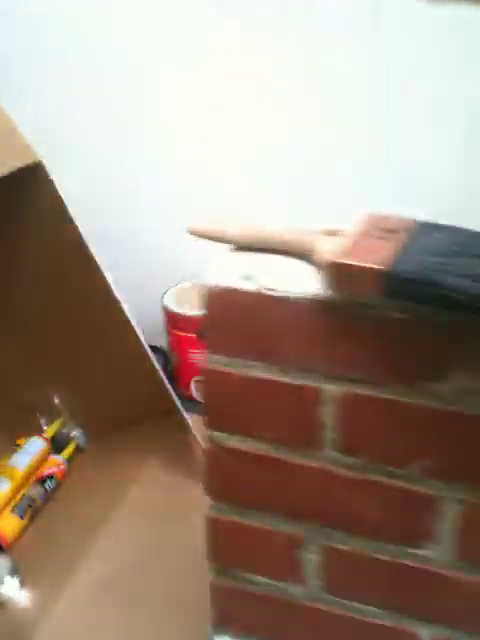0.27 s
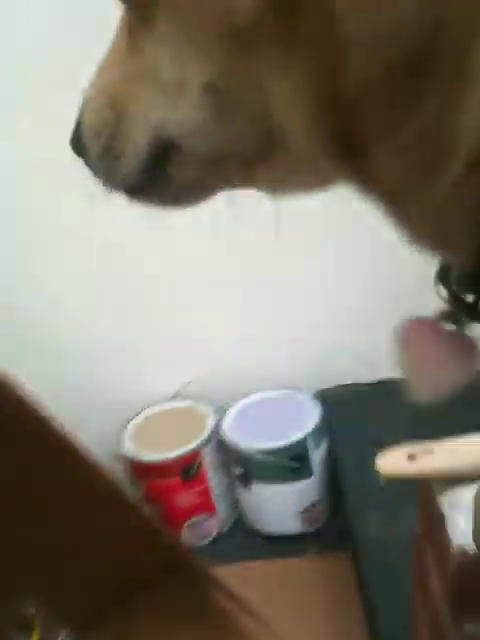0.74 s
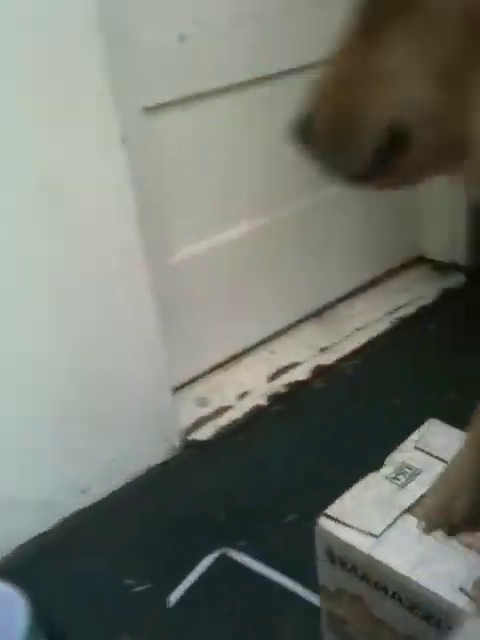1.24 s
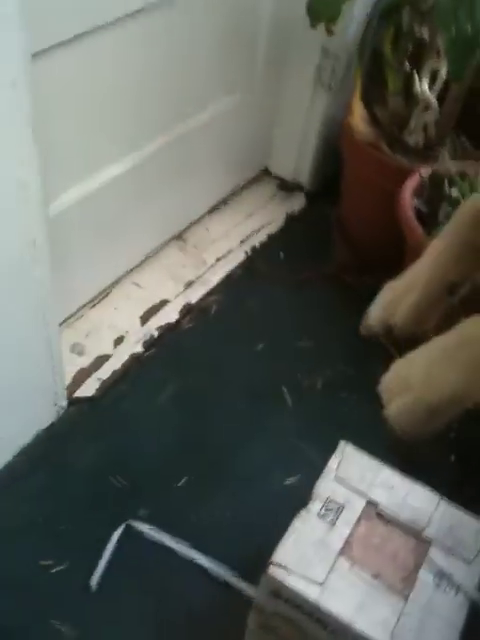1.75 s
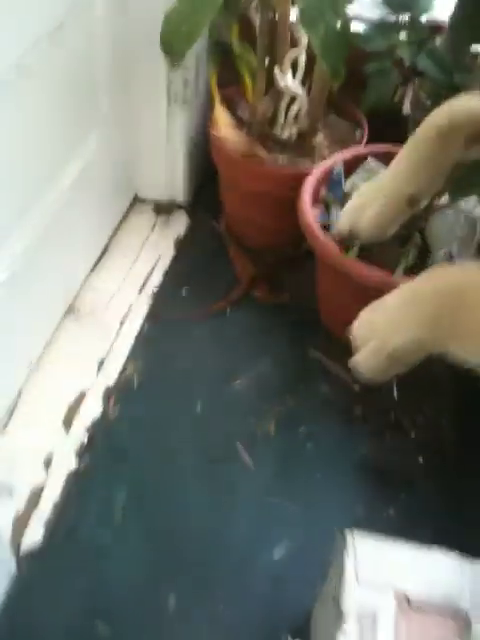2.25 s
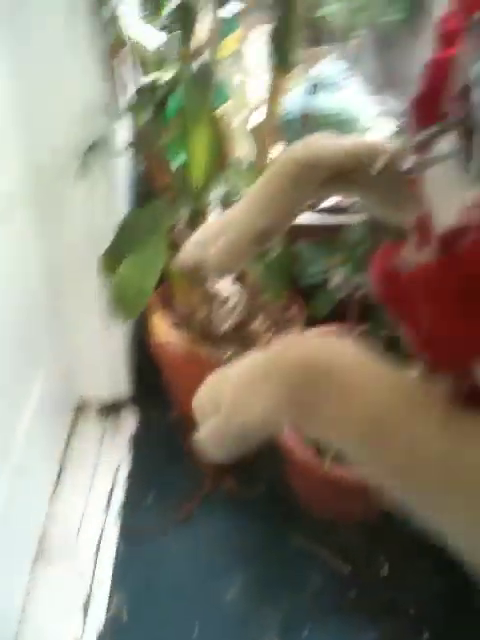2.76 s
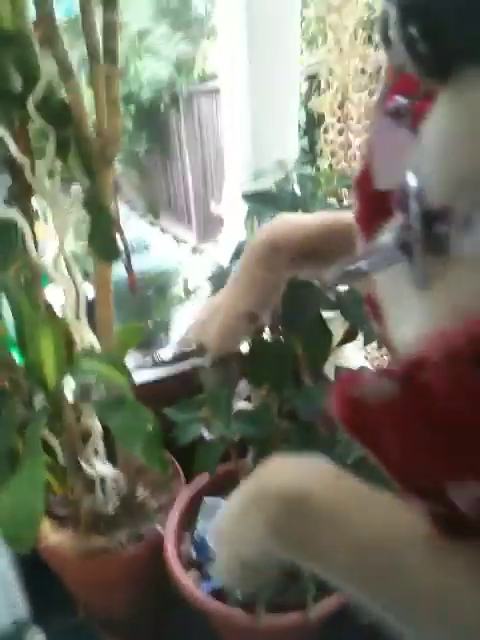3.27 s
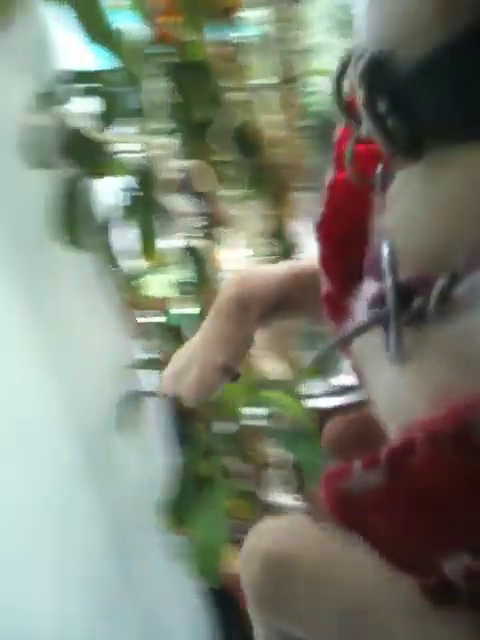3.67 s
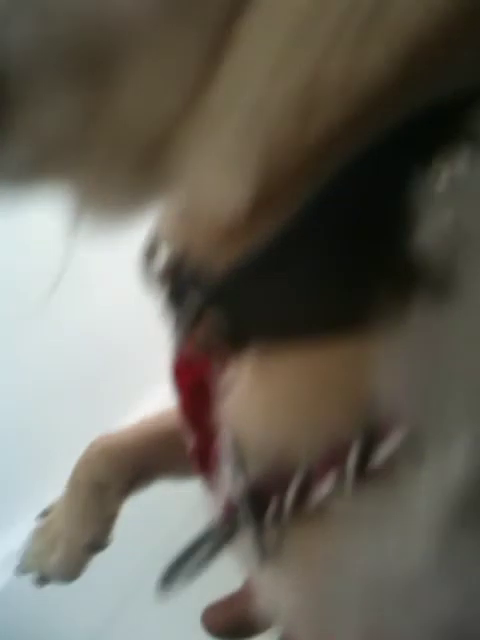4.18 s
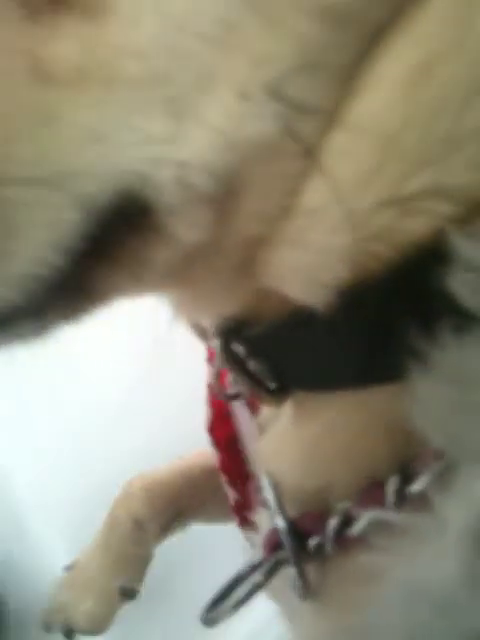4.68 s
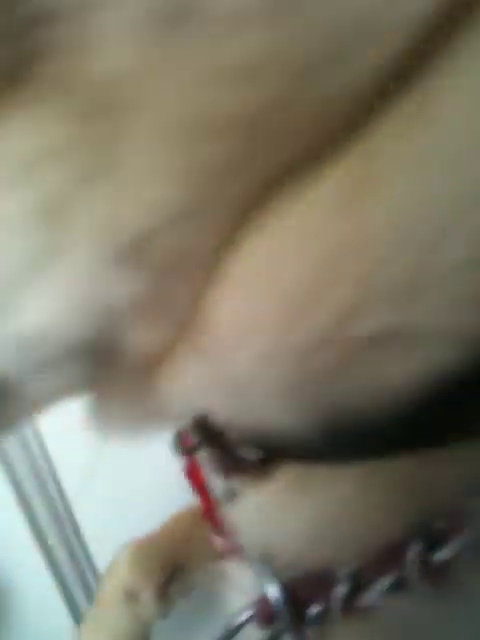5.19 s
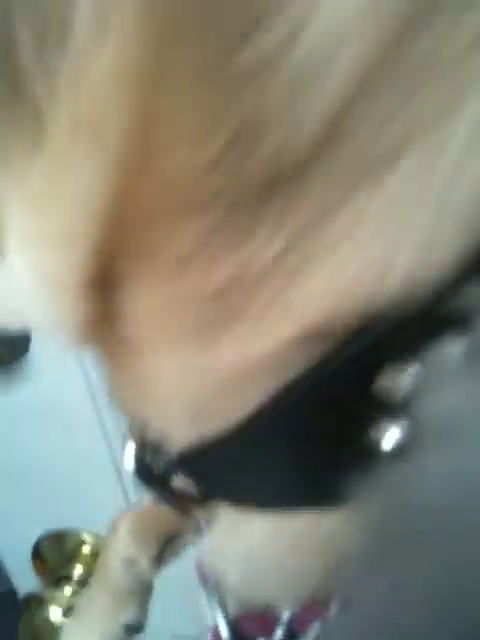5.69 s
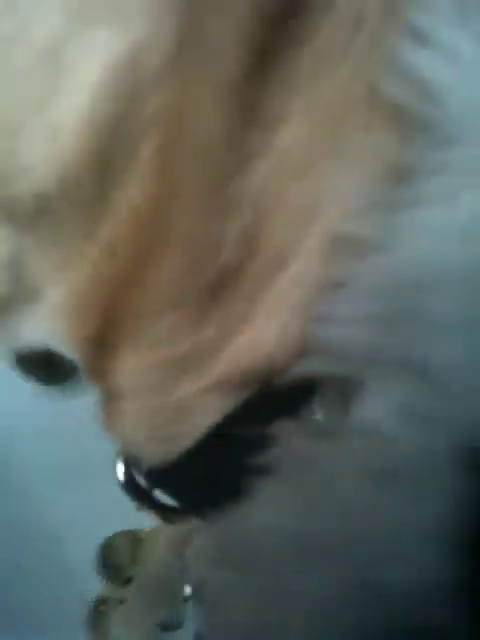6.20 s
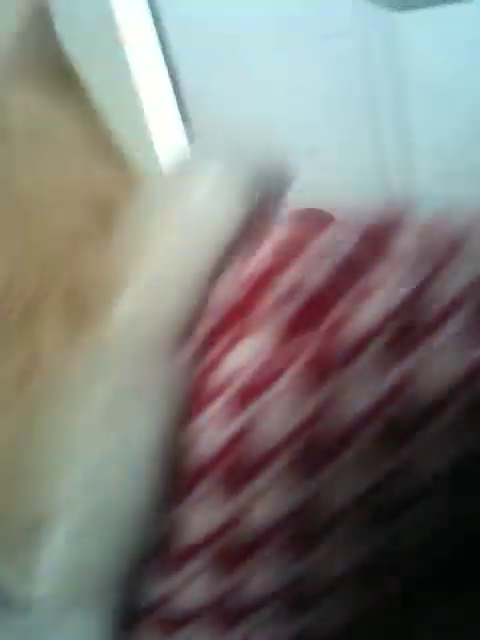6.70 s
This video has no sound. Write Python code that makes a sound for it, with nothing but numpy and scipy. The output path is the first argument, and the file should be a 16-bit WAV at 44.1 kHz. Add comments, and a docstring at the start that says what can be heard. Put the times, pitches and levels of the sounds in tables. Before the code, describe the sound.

Close metal links and a tag click irregularly over rubbing fur and cloth, interrupted by a sharp bump and scrape on the microphone.

```python
"""A dog's chain collar clicks, link against link, as the dog is carried on an arm across a porch, close to
the microphone of a small camera. Fur and cloth rub, paws and a hand knock softly, a metal name tag clinks,
and once something bumps and scrapes right on the microphone hole. A faint whistle comes and goes;
under it all lie quiet outdoor air and the hiss of the recorder."""
import sys
import numpy as np
from scipy import signal
from scipy.fft import rfft, irfft, next_fast_len
from scipy.io import wavfile
from scipy.ndimage import map_coordinates

SR = 44100
rng = np.random.default_rng(int(sys.argv[2]) if len(sys.argv) > 2 else 0)


def log_audio(samples):
    """Write samples as a 16-bit WAV file to the path given in sys.argv[1]."""
    # one column per channel
    frames = np.atleast_2d(samples).T
    # limit to full scale, then quantise
    limited = np.clip(frames, -1, 1)
    pcm = np.round(limited * 32767).astype(np.int16)
    wavfile.write(sys.argv[1], SR, pcm)


N = 305990
TIME = np.arange(N) / SR


def amp(db):
    """Gain of a level in dB."""
    return 10 ** (np.asarray(db) / 20)


def unit(x):
    """x scaled to rms 1."""
    return x / np.sqrt(np.mean(x ** 2) + 1e-20)


def fade(t, t60):
    """Gain that falls by 60 dB in t60 seconds."""
    return amp(-60 * t / t60)


def ring(t, hz, t60):
    """One dying tone of struck metal."""
    return fade(t, t60) * np.sin(2 * np.pi * hz * t)


def filtered(x, response):
    """x through a response given as a function of Hz."""
    size = next_fast_len(len(x) + 8192)
    hz = np.fft.rfftfreq(size, 1 / SR) + 1e-3
    return irfft(rfft(x, size) * response(hz), size)[:len(x)]


def resonance(f, hz, width_hz):
    """Causal response of one resonance at the frequencies f."""
    return 1j * f * width_hz / (hz * hz - f * f + 1j * f * width_hz)


def grainy_noise(spectrum, grit_db, grains_per_s):
    """Noise of rms 1 with a spectrum of (Hz, dB) points; its level jumps from grain to grain."""
    grains = rng.standard_normal(grains_per_s * N // SR + 2)
    jumps = map_coordinates(grains, [TIME * grains_per_s])
    noise = rng.standard_normal(N) * amp(grit_db * jumps)
    points_hz, db = np.transpose(spectrum)
    return unit(filtered(noise, lambda hz: amp(np.interp(np.log(hz), np.log(points_hz), db))))


def impacts(t, hz, t60, sharpness, rise_s, push, top_hz):
    """One row a contact: a push and a dying puff of noise through a double resonance, dull above top_hz."""
    envelope = fade(t, t60) * (1 - np.exp(-t / rise_s))
    energy = np.sum(envelope ** 2, 1)
    force = rng.standard_normal(envelope.shape) * envelope
    force[:, 1] = push * np.sqrt(energy)
    f = np.fft.rfftfreq(2 * len(t), 1 / SR)
    body = resonance(f, hz, hz / sharpness) ** 2
    low_pass = resonance(f, top_hz, top_hz) * top_hz / (1j * f + 1)
    puffs = irfft(rfft(force, 2 * len(t)) * body * low_pass)[:, :len(t)]
    return puffs * np.sqrt(energy / np.sum(puffs ** 2, 1))[:, None]


def placed(starts_s, sounds):
    """A track with each sound mixed in at its start."""
    track = np.zeros(N)
    for start, sound in zip(np.ravel(starts_s), sounds):
        part = track[round(start * SR):][:len(sound)]
        part += sound[:len(part)]
    return track


# Spectra of the dull rub, middle rub and fine swish. Each row: frequency in Hz, density in dB.
DULL_SPECTRUM = [(40, -10), (105, -20), (165, -0.5), (280, -0.5), (450, -4), (700, -7), (1000, -22),
                 (2000, -60)]
MIDDLE_SPECTRUM = [(400, -29.5), (750, -1.5), (1150, -1), (1400, -5), (2200, -7), (2900, -17.5),
                   (5000, -34.5)]
SWISH_SPECTRUM = [(1180, -30), (2000, -0.5), (3210, -6.5), (7150, -4), (7810, -3), (11200, -10.5),
                  (12400, -9), (15000, -17), (15800, -19), (16300, -33.5)]
# Fur brushing steadily on knitted cloth. Each row: time in seconds, middle rub and swish in dB.
BRUSHING = [(0, -60, -59), (.33, -62, -60), (.7, -64.5, -64.5), (.82, -68, -71.5), (.92, -59, -59),
            (1.13, -65, -62.5), (1.6, -64.5, -67), (1.95, -60.5, -61), (2.3, -64, -64.5), (2.5, -66, -81),
            (2.9, -60, -68.5), (3.55, -64, -70.5), (3.8, -70.5, -77.5), (4.1, -65, -65), (4.8, -69, -73.5),
            (5.4, -66, -76), (5.85, -77, -82.5), (6.1, -64, -68), (6.5, -72, -77.5), (6.8, -75.5, -77),
            (6.94, -59, -66)]
# Strokes of cloth, fur and hand, close to the microphone.
# Each row: peak time, rise and fall in seconds, then dull rub, middle rub and swish in dB.
STROKES = [(.374, 0.065, .1, -69, -60, -54), (.488, .06, .09, -56.5, -54.5, -55.5),
           (.6, 0.059, 0.12, -64, -62, -57), (.74, .1, .1, -58, -66, -66), (.87, 0.18, .15, -59, -72, -75),
           (.972, 0.039, 0.088, -43.5, -49, -42.5), (1.006, .05, 0.062, -43, -48, -39),
           (1.162, 0.052, 0.092, -73, -71, -57), (1.269, 0.094, 0.12, -42, -47.5, -60),
           (1.37, .15, 0.12, -58, -59, -55.5), (1.599, 0.1, 0.084, -66, -66, -55),
           (1.768, 0.043, .08, -62, -64, -54.5), (1.94, 0.18, .1, -48.5, -51, -55),
           (2.214, 0.073, .07, -54.5, -59, -59), (2.552, .02, 0.099, -41, -41, -56),
           (2.879, 0.25, .2, -59.5, -61, -66), (3.047, 0.058, 0.072, -49.5, -50, -52.5),
           (3.62, 0.23, .3, -60, -71, -78), (3.827, .07, .1, -51.5, -68.5, -68),
           (3.899, 0.044, 0.068, -57, -55.5, -52), (4.265, .2, .11, -69, -52.5, -50),
           (4.44, .015, .06, -62, -58, -50), (4.48, 0.076, .2, -60, -60, -62),
           (4.655, 0.032, 0.085, -61, -53, -59.5), (4.79, .1, 0.084, -68, -73, -64),
           (5.054, 0.057, 0.047, -57, -57, -53), (5.151, .015, .06, -49, -54, -58),
           (5.225, .06, .06, -43, -52, -72), (5.268, 0.064, 0.058, -44, -40, -55.5),
           (5.327, .05, 0.21, -52, -60, -76), (5.698, .04, .09, -67.5, -63, -48),
           (5.97, .05, 0.11, -62, -62, -60), (6.08, .13, 0.11, -57.5, -54.5, -62),
           (6.245, .02, .13, -63, -68, -56), (6.538, 0.086, 0.096, -57.5, -63, -65)]


def rubbing(dull_floor_db=-67, waver_db=2, edge_db=21.5, roundness=1.186):
    """Fibres catch and let go: gritty noise in three sizes of contact, swelling with each stroke."""
    t = np.arange(0, N + 64, 64) / SR
    times, middle_db, swish_db = np.transpose(BRUSHING)
    steady_db = [np.full_like(t, dull_floor_db), np.interp(t, times, middle_db),
                 np.interp(t, times, swish_db)]
    waver = [map_coordinates(drift, [t * 10]) for drift in rng.standard_normal((3, 80))]
    steady = amp(waver_db * np.array(waver) + steady_db)
    peak, rise, fall, *stroke_db = np.transpose(STROKES)[:, :, None]
    from_peak = np.abs(t - peak) / np.where(t < peak, rise, fall)
    swell = amp(-edge_db * from_peak ** roundness)
    power = steady ** 2 + amp(np.squeeze(stroke_db)) ** 2 @ swell ** 2
    dull, middle, swish = [np.interp(TIME, t, np.sqrt(band)) for band in power]
    return (dull * grainy_noise(DULL_SPECTRUM, grit_db=2.5, grains_per_s=50)
            + middle * grainy_noise(MIDDLE_SPECTRUM, grit_db=2.5, grains_per_s=120)
            + swish * grainy_noise(SWISH_SPECTRUM, grit_db=2, grains_per_s=200))


# A faint whistle behind the dog's sounds.
# Each row: start and end in seconds, pitch in Hz, level in dB, gain of the overtones in dB.
WHISTLES = [(0, .68, 2140, -65, 1), (3.46, 3.63, 1870, -64, -25), (5.29, 5.46, 1790, -59, -25),
            (6.83, 7, 1800, -63, -25)]


def whistle(width_hz=130, edge_s=.03):
    """A fuzzy tone: noise through a narrow resonance and its first multiples, fading in and out."""
    track = np.zeros(N)
    for start, end, hz, db, overtones_db in WHISTLES:
        def harmonics(f):
            return sum(amp(overtones_db * (k > 1)) * resonance(f, k * hz, k * width_hz) ** 2 / k ** .5
                       for k in range(1, 5))
        gate = np.clip(np.minimum(TIME - start, end - TIME) / edge_s, 0, 1)
        track += amp(db) * gate * unit(filtered(rng.standard_normal(N), harmonics))
    return track


# The background on the porch. Each row: frequency in Hz, density in dB.
AIR_SPECTRUM = [(15, -45), (25, -17), (53, -12), (95, -6), (146, -2), (237, 0), (295, -6), (873, -7.5),
                (1350, -12), (1820, -12), (2960, -21), (9500, -24.5), (15100, -31), (16300, -42)]


def outdoor_air(level_db=-63):
    """Quiet open air and recorder hiss, as one slightly wavering noise."""
    return amp(level_db) * grainy_noise(AIR_SPECTRUM, grit_db=.7, grains_per_s=20)


# The tones of the collar's links and rings. Each row: pitch in Hz, t60 in seconds.
LINK_TONES = [(3620, .045), (4850, .04), (5100, .065), (5800, .07), (6430, .07), (7830, .06), (8950, .04),
              (9420, 0.057), (10020, 0.059), (10610, .05), (11360, .06), (12080, 0.045), (13230, .04),
              (13770, .05), (14400, .05), (15080, .03)]
# Links touching, close to the microphone. Each row: start in seconds, level in dB,
# centre of the crack in Hz, pitch of the struck link in Hz, its ringing in dB relative to the crack.
LINK_CLICKS = [(.0691, -44, 6050, 5800, -8), (.0917, -31, 7990, 8950, -21), (.183, -40, 6600, 8950, -19),
               (.3566, -28, 8900, 3620, -8), (.3639, -19.5, 10500, 11360, -14),
               (.4707, -42, 5970, 5800, -13), (.4882, -39.5, 7450, 6430, -20),
               (.5305, -46, 4700, 5100, -20), (.5807, -38.5, 8860, 6430, -26), (.5987, -40, 6410, 6430, -8),
               (.6023, -40, 6870, 3620, -12), (.6637, -31.5, 9400, 12080, -15),
               (.7128, -33, 6700, 6430, -6.5), (.7192, -42, 6680, 3620, -10), (.7639, -41, 8880, 4850, -13),
               (.7948, -43, 8210, 8950, -25), (.8422, -47, 7060, 8950, -17), (.8976, -39, 9000, 10020, -29),
               (.9226, -43.5, 7320, 4850, -11), (.9596, -37, 8090, 5800, -7), (.9634, -31, 7110, 6430, -15),
               (.9674, -30, 7600, 10610, -13), (.9857, -22, 8620, 7830, -11),
               (.9904, -15.5, 7470, 7830, -17.5), (1.0016, -9, 7830, 8950, -28),
               (1.0176, -16, 7450, 7830, -21), (1.0208, -22, 6500, 6430, -16),
               (1.0739, -44, 6810, 5100, -10), (1.0859, -43, 8000, 7830, -19),
               (1.1462, -39, 9000, 13770, -28), (1.3298, -45, 8260, 7830, -10),
               (1.4581, -48, 6050, 5800, -9), (1.4922, -42.5, 6950, 5100, -16),
               (1.5441, -40, 9520, 7830, -29), (1.5793, -28.5, 9460, 14400, -18),
               (1.6133, -45, 6280, 5800, -3.5), (1.6209, -52, 5990, 5800, -4),
               (1.6653, -40.5, 7140, 7830, -30), (1.7335, -45, 7130, 5100, -26),
               (1.7657, -28, 10500, 11360, -9), (1.7705, -40, 9400, 5100, -2),
               (1.8395, -32, 7750, 5800, -20), (1.8906, -45, 9000, 4850, -28),
               (1.9148, -43.5, 5660, 3620, -9), (1.9405, -43, 6940, 3620, -18),
               (1.9609, -34, 2900, 3620, -28), (2.0405, -48, 4900, 5100, -16),
               (2.2378, -48, 5630, 5800, -15), (2.5043, -35, 6000, 10610, -13),
               (2.542, -38, 8000, 3620, -13), (2.6787, -55, 5920, 5800, -14),
               (2.9565, -56, 4730, 5100, -16), (3.0449, -30, 9540, 5100, -16),
               (3.0486, -36, 7520, 5100, -18), (3.1846, -21.5, 4300, 4850, -30),
               (3.6537, -51.5, 5000, 3620, -23), (3.7698, -45.5, 9900, 10020, -12),
               (3.8855, -29.5, 5370, 7830, -15.5), (3.9892, -35, 8050, 5800, -23),
               (3.9954, -48, 7940, 13230, -18), (4.0884, -42.5, 7170, 3620, -3),
               (4.0937, -40, 7300, 3620, -21), (4.1654, -45, 5360, 3620, -10),
               (4.4335, -34, 8860, 10610, -16), (4.4418, -38, 8300, 12080, -16),
               (4.4854, -48, 7510, 5800, -17), (4.5248, -40.5, 4700, 3620, -27.5),
               (4.6039, -51, 5660, 3620, -22), (4.6435, -26, 4760, 4850, -24),
               (4.6469, -31.5, 5020, 4850, -18), (4.6827, -54, 5680, 3620, -19),
               (4.7078, -50, 5740, 3620, -21), (4.8859, -52, 9800, 10020, -18),
               (4.9072, -54, 9000, 5800, -18), (5.0426, -45.5, 6400, 8950, -14),
               (5.1445, -41, 5730, 4850, -11), (5.2493, -39, 5580, 3620, -15),
               (5.2739, -36, 5510, 3620, -13), (5.7154, -39, 8760, 8950, -10),
               (5.7446, -34, 10100, 10020, -14.5), (5.7473, -40, 9030, 10610, -21.5),
               (5.9834, -39.5, 9100, 9420, -17), (6.1036, -52, 9000, 7830, -20),
               (6.2333, -29, 5230, 5100, -27), (6.3924, -52, 5540, 4850, -21),
               (6.812, -48.5, 4600, 4850, -27)]


def chance_ticks(per_s=6, level_db=-55.5, centre_hz=6500, ring_db=-15):
    """Faint touches of the links at random times, as rows like those of LINK_CLICKS."""
    when, link, size, pitch = rng.random((per_s * N // SR, 4)).T
    db = level_db + 8 * (size - .5)
    crack_hz = centre_hz * 2 ** (.9 * (pitch - .5))
    struck_hz = np.array(LINK_TONES)[(link * len(LINK_TONES)).astype(int), 0]
    return np.transpose([when * N / SR, db, crack_hz, struck_hz, np.full_like(when, ring_db)])


def chain_collar(crack_t60_s=.011, other_links_db=-17):
    """Each touch is a short crack; the struck link rings on, the others more faintly."""
    t = np.arange(3072) / SR
    starts, db, crack_hz, struck_hz, ring_db = np.vstack([LINK_CLICKS, chance_ticks()]).T[:, :, None]
    cracks = impacts(t, crack_hz, np.full_like(starts, crack_t60_s),
                     sharpness=1.15, rise_s=.0002, push=.35, top_hz=1.4 * crack_hz)
    link_hz, t60 = np.transpose(LINK_TONES)[:, :, None]
    octaves_apart = np.abs(np.log2(link_hz.T / struck_hz))
    share_db = np.maximum(-120 * octaves_apart, rng.normal(other_links_db, 5, octaves_apart.shape))
    # each link also has a lower, shorter twin tone
    tones = ring(t, link_hz, t60) + amp(-1) * ring(t, .95 * link_hz, .5 * t60)
    return placed(starts, amp(db) * (cracks + amp(ring_db + share_db) @ tones))


# Paws, cloth and hand knocking near the camera.
# Each row: start in seconds, level in dB, centre in Hz, t60 in seconds.
KNOCKS = [(0.1835, -46.5, 980, 0.078), (0.2372, -50, 1020, .05), (.4726, -40.5, 457, 0.047),
          (.6608, -46, 920, .026), (.713, -44.5, 476, .055), (.7659, -48, 630, .047),
          (0.839, -52, 590, 0.073), (0.9864, -36, 490, .05), (1.001, -35.5, 1340, 0.019),
          (1.2593, -34, 600, .061), (1.2915, -40, 460, 0.11), (1.3422, -46, 520, .049),
          (1.5797, -50, 1540, 0.06), (1.7993, -46, 910, .039), (1.9016, -41, 725, 0.11),
          (1.9374, -36.5, 1270, 0.075), (1.9605, -37, 1550, 0.05), (2.1918, -44, 380, 0.12),
          (2.5444, -25, 800, 0.058), (2.8069, -50, 860, 0.038), (2.9207, -48, 930, 0.073),
          (3.026, -47, 450, .06), (3.0427, -36.5, 840, 0.06), (3.8113, -42.5, 368, 0.036),
          (3.831, -47, 490, 0.098), (3.8852, -32, 1510, 0.05), (4.0357, -47.5, 870, .04),
          (4.2641, -49, 1360, .106), (4.4318, -40, 1200, .035), (4.5496, -51, 290, .097),
          (4.6404, -34, 980, 0.06), (5.0092, -45.5, 490, .074), (5.1455, -38.5, 870, .069),
          (5.184, -39, 1000, .09), (5.2232, -31, 560, .06), (5.2494, -20, 880, .02),
          (5.274, -33, 1100, .05), (5.3518, -46, 1500, .05), (5.356, -42, 950, .07),
          (5.9701, -43, 490, 0.026), (6.233, -49.5, 1560, .047), (6.5168, -48, 309, .15),
          (6.8107, -50, 750, .039)]


def soft_knocks():
    """Soft things do not ring: one low push and a dull puff."""
    t = np.arange(8192) / SR
    starts, db, centre_hz, t60 = np.transpose(KNOCKS)[:, :, None]
    puffs = impacts(t, centre_hz, t60, sharpness=1.1, rise_s=.001, push=1.1, top_hz=2530)
    return placed(starts, amp(db) * puffs)


# The name tag's lower tones. Each row: pitch in Hz, relative level in dB, t60 in seconds.
TAG_LOW_TONES = [(8040, 0, .035), (9920, -14, .04)]
# Strikes on the tag, close to the microphone.
# Each row: start in seconds, level of the high tone in dB, lower tones in dB relative to it.
TAG_CLINKS = [(0.8917, -61.5, 21), (.897, -53.5, 8), (1.1463, -34, 0), (1.8896, -56.5, 13),
              (3.0006, -40.5, -20), (3.5703, -65, -9), (4.322, -48.5, -14), (4.7601, -47.5, -20),
              (6.8687, -54, -10)]


def name_tag():
    """A thin metal tag is struck: one long high tone and shorter lower ones."""
    t = np.arange(8192) / SR
    high = ring(t, hz=14030, t60=.062)
    low = sum(amp(db) * ring(t, hz, t60) for hz, db, t60 in TAG_LOW_TONES)
    starts, high_db, low_db = np.transpose(TAG_CLINKS)[:, :, None]
    return placed(starts, amp(high_db) * (high + amp(low_db) * low))


# A scrape right across the microphone hole. Each row: time in seconds, level in dB.
SCRAPE_LEVELS = [(3.185, -45), (3.194, -24), (3.24, -24), (3.26, -27), (3.292, -23), (3.315, -25),
                 (3.322, -33.5), (3.352, -37.5), (3.41, -37), (3.42, -61)]
# The colour of the cavity in front of the microphone. Each row: frequency in Hz, density in dB.
CAVITY_SPECTRUM = [(60, -40), (108, -25), (160, -8), (270, -8), (400, -12), (820, -14), (1080, -1),
                   (1300, -1), (1550, -10.5), (2350, -17.5), (3000, -32), (5000, -37), (5750, -34),
                   (6300, -38), (16000, -54)]


def microphone_hole(bump_at_s=3.1847, bump_db=-2, push_s=.0021, t60_s=.012):
    """A bump and a scrape set the small cavity in front of the microphone ringing."""
    times, db = np.transpose(SCRAPE_LEVELS)
    scrape_gain = amp(np.interp(TIME, times, db, left=-120, right=-120))
    scrape = scrape_gain * grainy_noise(CAVITY_SPECTRUM, grit_db=2.5, grains_per_s=200)
    age = np.maximum(TIME - bump_at_s, 0)
    cavity = sum(gain * np.sin(2 * np.pi * hz * age)
                 for hz, gain in [(1200, -1), (1620, .3), (2400, .17), (2800, .06)])
    attack = 1 - np.exp(-age / .0003)
    decay = fade(np.maximum(age - push_s, 0), t60_s)
    return scrape + amp(bump_db) * attack * decay * cavity


def porch_walls(sound, delay_s=.006, t60_s=.2, level_db=-22):
    """The nearby walls answer with a short, faint tail."""
    t = np.arange(SR // 2) / SR
    tail = rng.standard_normal(len(t)) * fade(t, t60_s) * (t > delay_s)
    return amp(level_db) * signal.fftconvolve(sound, tail / np.linalg.norm(tail))[:N]


def scene(low_hz=120):
    """The porch in mono, heard from a camera close to the dog."""
    hits = chain_collar() + soft_knocks() + name_tag()
    contacts = hits + porch_walls(hits) + microphone_hole()
    # the microphone's bass cut thins the close clicks, knocks and bump
    contacts = filtered(contacts, lambda hz: (resonance(hz, low_hz, low_hz) * 1j * hz / low_hz) ** 2)
    return (contacts + outdoor_air() + rubbing() + whistle())[None]


def record(dry):
    """The microphone rounds off the highest peak; the recorder thins the bass and ends at its band limit."""
    ceiling, bass_hz, bass_db, top_hz = .72, 120, -12, 16450
    rounded = dry[0] / (1 + np.abs(dry[0] / ceiling) ** 6) ** (1 / 6)

    def recorder(hz):
        high_pass = 1 / np.hypot(1, (bass_hz / hz) ** 6)
        return np.hypot(amp(bass_db), high_pass) * (hz < top_hz)
    return filtered(rounded, recorder)[None]


dry = scene()
out = record(dry)
log_audio(out)
```